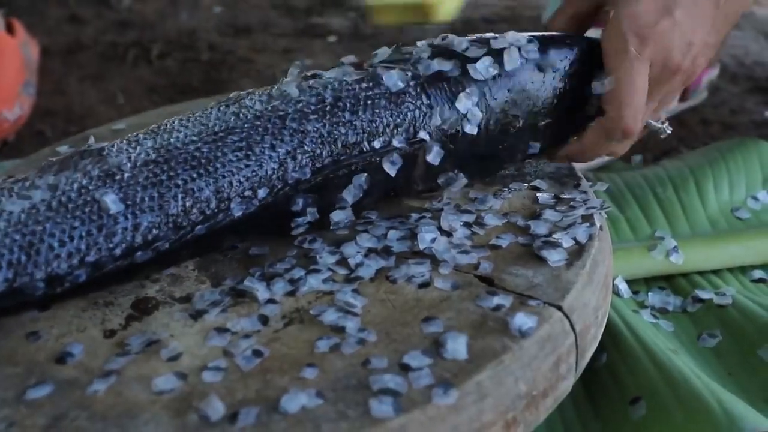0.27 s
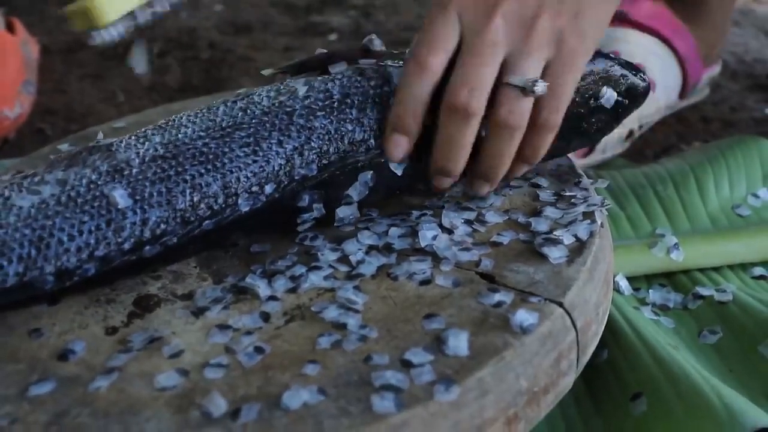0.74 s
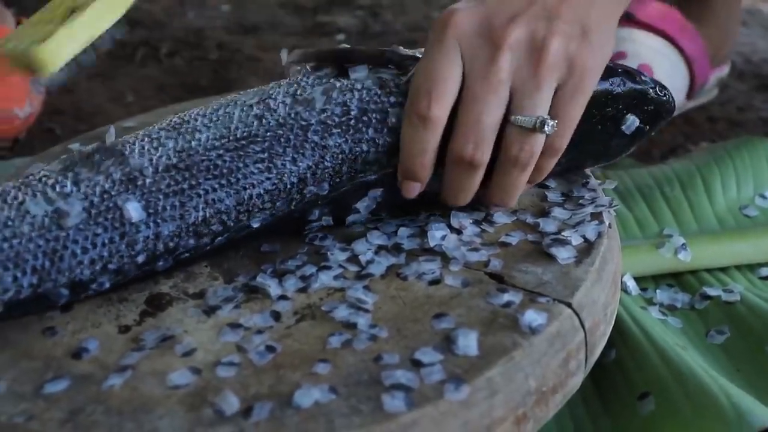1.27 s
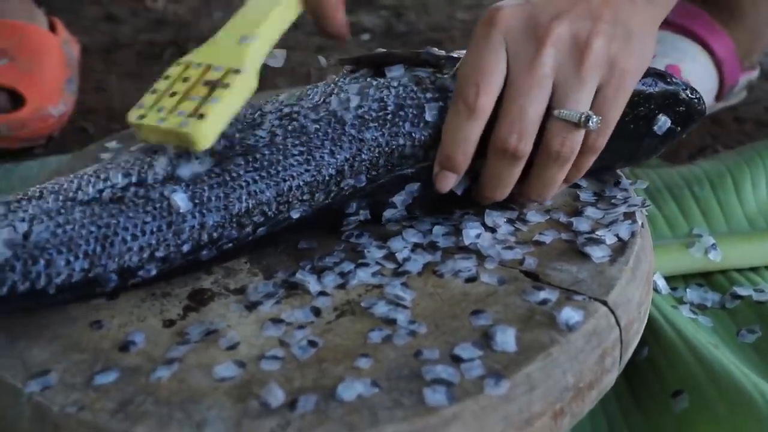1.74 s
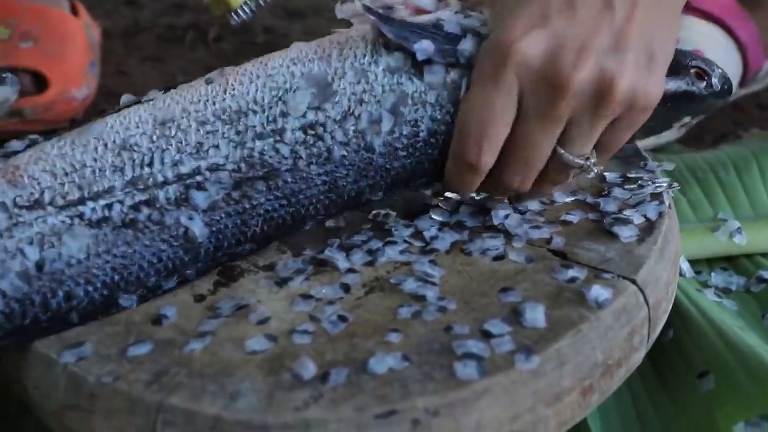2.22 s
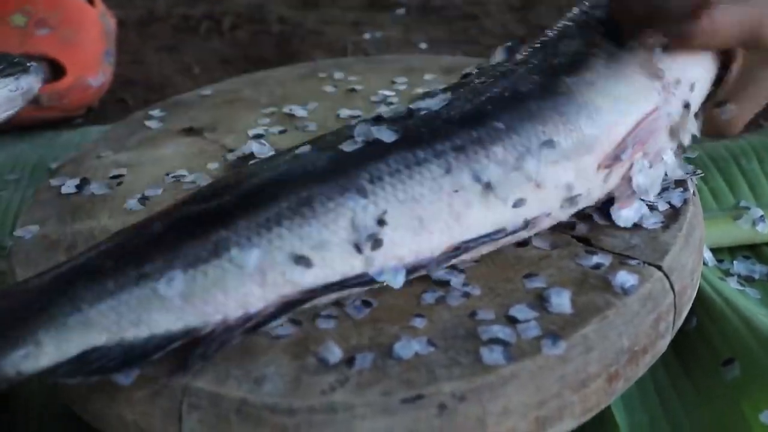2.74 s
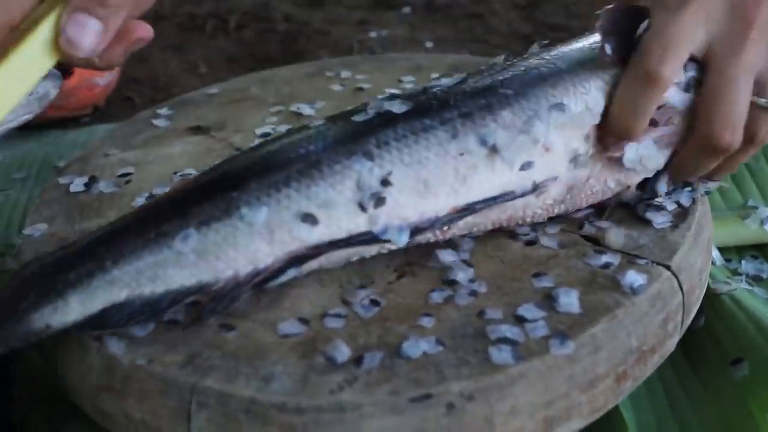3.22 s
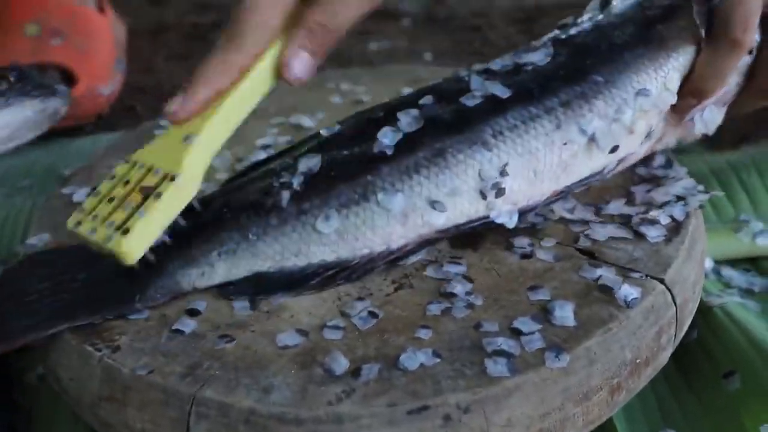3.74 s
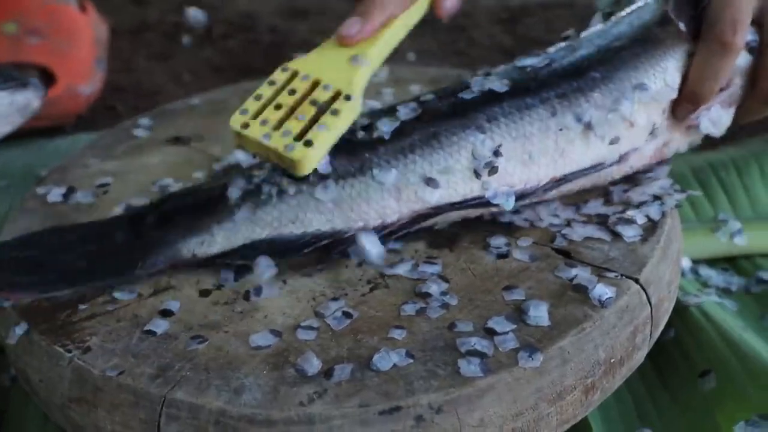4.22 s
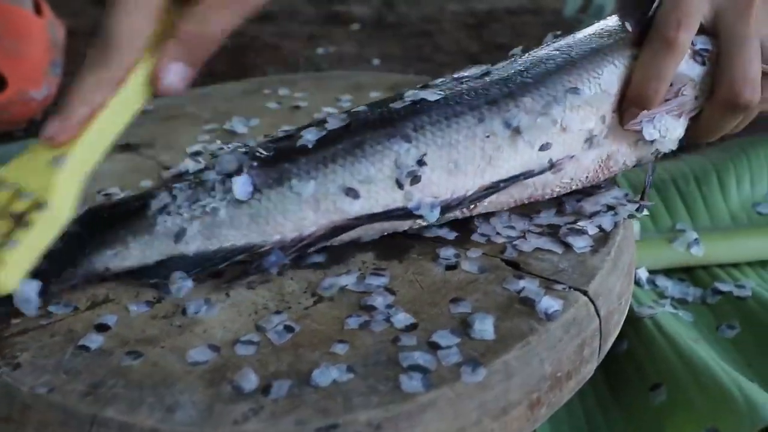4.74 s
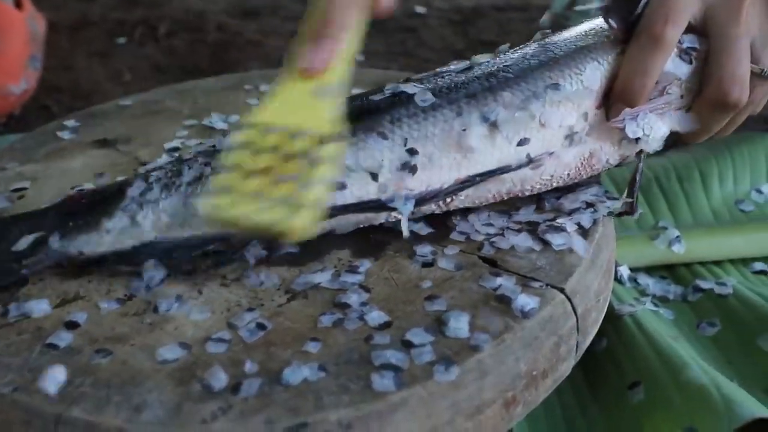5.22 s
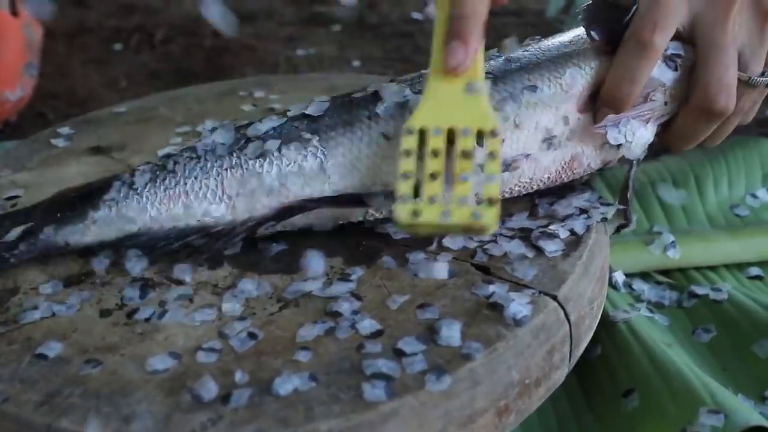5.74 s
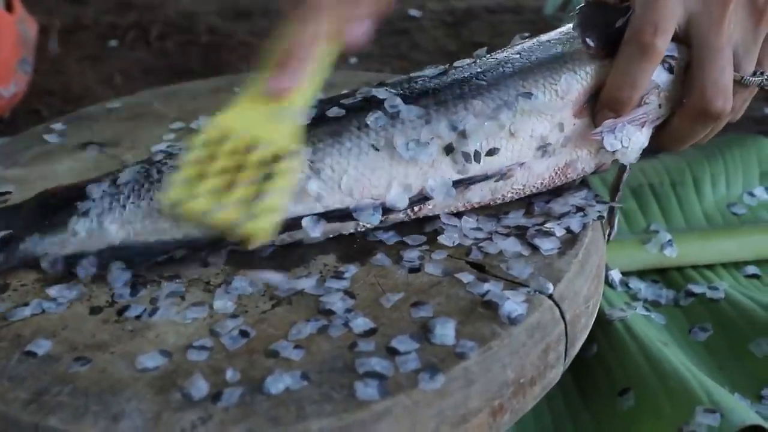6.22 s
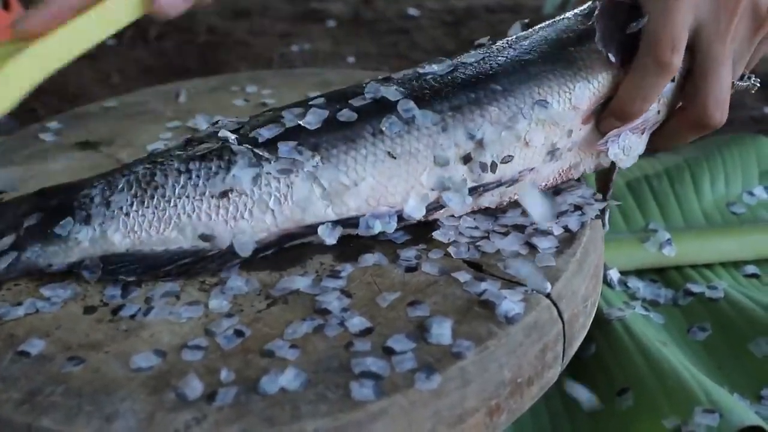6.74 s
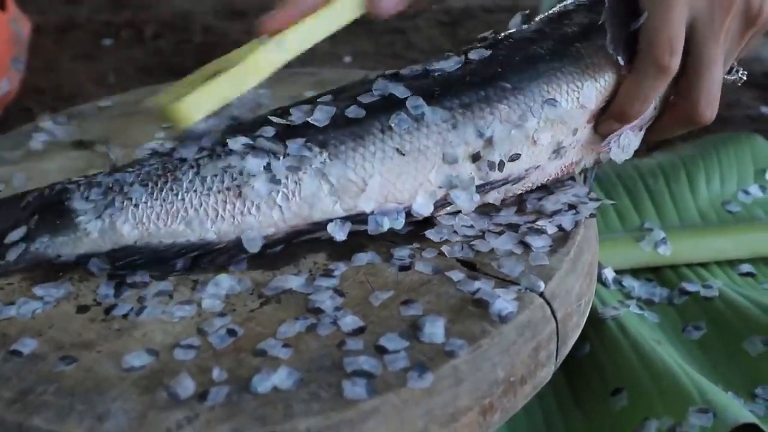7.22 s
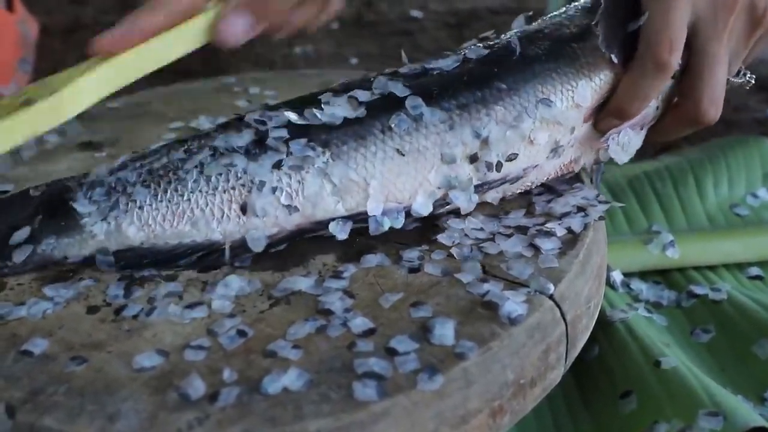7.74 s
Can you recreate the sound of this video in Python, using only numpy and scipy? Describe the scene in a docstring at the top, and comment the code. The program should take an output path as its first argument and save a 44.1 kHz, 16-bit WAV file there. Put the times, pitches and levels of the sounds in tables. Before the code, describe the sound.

Very close, a plastic scaler with nail teeth scrapes a whole fish on a thick wooden board. A few uneven strokes come first, then a quieter moment of handling and sliding as the fish is turned, then steady strokes about three a second. Each is a short gritty rasp with rattling scales and sharp snaps; dull thuds come from the board. Quiet open air behind, dry mono, loudest snaps clipped.

```python
"""Outdoors, a thick wooden board: a plastic scaler with nail teeth strokes a whole fish, close to the
microphone. Teeth rasp (filtered grains), rows of scales rattle (near-even flicks), single scales snap (noisy
impulses). Fish and board thud (damped resonances); nails ring (decaying sines); something metal is rubbed and
squeaks (narrow-band noise). Quiet open air (banded noise) lies behind; the loudest snaps clip."""
import sys
import numpy as np
from scipy import signal
from scipy.io import wavfile
from scipy.ndimage import uniform_filter1d

SR = 44100
rng = np.random.default_rng(int(sys.argv[2]) if len(sys.argv) > 2 else 0)


def wav_record(signal):
    """Record a signal, one row per channel, as 16-bit PCM in the file named by sys.argv[1]."""
    frames = np.transpose(np.atleast_2d(signal))
    bounded = np.clip(frames, -1, 1)
    # unit amplitude maps onto the largest positive 16-bit level
    quanta = np.round(bounded * 32767).astype(np.int16)
    wavfile.write(sys.argv[1], SR, quanta)


N = 351918

# Firm strokes: (start [s], rise [s], pull [s], top force [dB], sag over the pull [dB],
# treble re force [dB], board load re force [dB])
FIRM_STROKES = [(0.0, 0.013, 0.011, -14.5, 11, 0.5, -16), (0.215, 0.083, 0.063, -27.5, 7, -2, -8),
                (0.574, 0.1, 0.032, -26, 9.5, -5, -6.5), (1.109, 0.014, 0.15, -22.5, 8, -10.5, -7),
                (1.53, 0.013, 0.086, -17, 7.5, -12, -6.5), (1.782, 0.013, 0.081, -19, -3.5, -9, -6.5),
                (2.05, 0.025, 0.084, -14.5, 11.5, -10, -9), (2.597, 0.14, 0.063, -34, 29, 5, -5),
                (2.979, 0.1, 0.067, -37.5, 12, -3, -7.5), (3.55, 0.0052, 0.16, -19.5, 11, -1.5, -9),
                (3.905, 0.031, 0.12, -18, 7.5, -2.5, -13), (4.265, 0.048, 0.065, -18.5, 10.5, -3.5, -8.5),
                (4.6, 0.038, 0.064, -19.5, 8.5, -5, -8.5), (4.9, 0.065, 0.079, -18, 14, -1, -3),
                (5.197, 0.047, 0.083, -17, -1.5, -3, -7.5), (5.485, 0.038, 0.088, -16.5, 6.5, -7.5, -7.5),
                (5.772, 0.018, 0.08, -14.5, 9.5, -4.5, -2.5), (6.05, 0.033, 0.053, -16.5, 3, -2.5, -2.5),
                (6.338, 0.025, 0.07, -15.5, 5, -3.5, -1.5), (6.64, 0.056, 0.082, -20, 1.5, -3.5, -9),
                (6.995, 0.0039, 0.078, -21.5, -3.5, -3.5, -6), (7.307, 0.011, 0.12, -23, -4, -2.5, -12),
                (7.629, 0.055, 0.065, -13.5, 6, -10, -15), (7.932, 0.027, .03, -24, -2, -8.5, -16.5)]
# Light drags and handling between strokes: (start [s], length [s], mid-way force [dB],
# change start to end [dB], load re force [dB])
LIGHT_DRAGS = [(0.012, 0.066, -44.5, 3, -3), (0.826, 0.082, -46.5, 19.5, 9.5),
               (1.612, 0.14, -33.5, 5.5, -7.5), (1.914, .145, -43.5, 11, -2),
               (2.156, 0.15, -34.5, -20.5, -7.5), (3.327, 0.23, -38.5, 8.5, -3.5),
               (3.717, 0.19, -41, -6, -3), (4.043, 0.21, -39.5, 0, -8), (4.43, 0.16, -42.5, 8, -5.5),
               (4.769, 0.19, -42.5, -8, -8), (5.066, 0.048, -31, 0.5, -6.5), (5.351, 0.036, -38, 31, -7.5),
               (5.627, 0.056, -37, -11, -13), (5.872, 0.15, -42.5, -1, -2), (6.174, 0.047, -45, 18, -4),
               (6.249, 0.083, -44.5, 16, -1), (6.432, 0.06, -47, -5, 5), (6.58, 0.1, -43.5, 16, -7),
               (6.779, 0.087, -53.5, -3, -7), (7.084, 0.02, -35, -20, -5), (7.197, 0.037, -35, 12, -24),
               (7.445, 0.16, -47, -26, -11), (7.753, 0.089, -32, -14, -11.5)]
# Colour along the fish: (time [s], deep thud re load [dB], topmost treble gain [dB],
# tooth chatter re board [dB], rattle re force [dB])
FISH_COLOUR = [(0, -2, -9, -1.5, -10), (1.1, -12, -1, -16.5, -3.5), (2.2, -17.5, -13, -8, -3.5),
               (3, -7, -4, -6.5, -8), (4.6, -5.5, -2, -1.5, -3.5), (5.6, -5, 0, -1, -5),
               (6.6, -12.5, -5.5, -3, -1.5), (7.98, -4.5, -2.5, 3.5, -3)]
# Loud single scales snapping off: (time [s], peak of the scale ring [dB])
SCALE_SNAPS = [(.019, -4.5), (0.0708, -14.5), (.307, -17), (0.3317, -13), (0.3397, -13.5), (1.114, -8.5),
               (1.118, -11), (1.125, -8), (1.1357, -6.5), (1.5375, -7.5), (1.5445, -1), (1.5507, -10),
               (1.5704, -6), (1.789, -8), (1.818, -3), (2.066, -13), (2.0733, -1), (2.0793, -2),
               (2.0835, -2), (2.485, -28.5), (2.6945, -26), (3.063, -18.5), (3.5556, -4), (3.5854, -2.5),
               (3.6166, -6), (3.6487, -6.5), (3.683, -14.5), (3.713, -11), (3.944, -1.5), (4.0238, 1),
               (4.041, -3), (4.295, -7), (4.328, -4), (4.6335, -5.5), (4.9736, -4), (5.0264, -14),
               (5.2368, -2), (5.246, -4), (5.3088, -1.5), (5.593, -5.5), (5.782, -4), (5.8603, -7),
               (6.156, -20.5), (6.3156, -14.5), (6.428, -18), (6.692, -2.5), (6.771, -10), (7.311, -10.5),
               (7.333, -3), (7.4189, -4), (7.6752, -2.5), (7.694, 0)]
# Scaler or fish lands: (time [s], peak [dB], pitch [Hz])
LANDINGS = [(1.928, -29.5, 1020), (2.67, -25, 1440), (3.104, -28.5, 394), (3.151, -27.5, 553),
            (3.445, -30, 905), (5.135, -27, 930), (5.203, -11, 625), (5.483, -12, 620), (5.772, -9, 770),
            (6.002, -28, 668), (6.046, -7.5, 626), (6.594, -29, 940), (6.923, -26.5, 910),
            (7.552, -24.5, 900), (7.594, -23, 645), (7.809, -25, 676)]
# Fish slides on the wood: (start [s], length [s], level [dB])
FISH_SLIDES = [(1.571, 0.077, -32.5), (2.121, 0.15, -41), (2.548, 0.21, -49.5), (3.339, 0.1, -41.5),
               (3.486, 0.086, -34)]
# Something metal is rubbed: (start [s], length [s], level [dB])
METAL_RUBS = [(2.689, 0.046, -32), (3.47, 0.07, -37), (4.063, 0.036, -34.5)]
# Nail left ringing: (time [s], level [dB], pitch re the nail modes [ratio])
NAIL_RINGS = [(1.234, -30, .95), (7.51, -26, 1), (7.805, -24, 1)]
# Scale resonances: (centre [Hz], width [Hz], gain [dB])
SCALE_MODES = [(2730, 1040, -4.5), (4173, 560, 3.5), (5095, 1040, -1)]
# Treble resonances of the scales: (centre [Hz], width [Hz], gain [dB])
TREBLE_MODES = [(6160, 4500, -5), (9830, 3300, -7), (12800, 7100, -8)]
# Board resonances: (centre [Hz], width [Hz], gain [dB])
BOARD_MODES = [(334, 144, -0.5), (622, 213, -2.45), (1036, 257, -2.1)]
# Nail modes: (pitch [Hz], level [dB], 60 dB decay [s], onset delay [s])
NAIL_MODES = [(4000, 2.5, 0.069, 0.02), (6490, 4, 0.066, 0.0007)]
# Metallic sheen modes: (centre [Hz], level [dB])
SHEEN_MODES = [(1800, -1.5), (4580, -11.5), (5850, 4), (7260, 3), (8850, -6)]
# Open-air spectrum: (frequency [Hz], relative density [dB per Hz])
AIR_SPECTRUM = [(30, 1), (350, -3), (1000, -11), (2500, -20), (4500, -12), (16000, -32.5)]

BITE_DB = 20.5  # a stroke touches down this far below its top
TRAIL_S, TRAIL_DB, TRAIL_DB_PER_S = 0.0078, -20.5, 397  # teeth leave the skin: quick drop plus fade
DRAG_ARCH_DB, DRAG_TREBLE_DB = 6, -3  # mid-way swell; treble re force
REST_DB, REST_LOAD_DB = -58.5, -5.5  # fish shifting under the resting hand; load re force
RASP_YIELD = 0.6  # share of the rasp that gives way to the rattle in a firm stroke
RATTLE_PER_S, RATTLE_JITTER, RATTLE_SPREAD_DB = 270, 0.3, 4
FLICK_HZ, FLICK_WIDTH_HZ = 4290, 2030  # a scale flicked free
SNAP_TREBLE_DB = 3.5  # re the treble of the stroke
SHEEN_WIDTH_HZ, AIR_DB, TOP_HZ = 53, -52.5, 16000


def undb(db):
    """Decibels to gain."""
    return 10 ** (np.asarray(db) / 20)


def unit(x):
    """Scale to rms 1."""
    return x / np.sqrt(np.mean(x ** 2))


def curve(rows, column):
    """Table column joined by straight lines in time."""
    rows = np.array(rows)
    return np.interp(np.arange(N) / SR, rows[:, 0], rows[:, column])


def band(x, hz, width_hz):
    """Two-pole resonance, gain 1 at the centre."""
    b, a = signal.iirpeak(hz, hz / width_hz, fs=SR)
    return signal.lfilter(b, a, x)


def body(x, modes):
    """Resonances summed, neighbours in opposite phase."""
    return sum((-1) ** k * undb(db) * band(x, hz, width_hz)
               for k, (hz, width_hz, db) in enumerate(modes))


def walk(rate_hz):
    """Random levels held 1 / rate, slewed over one hold; spread just under 1."""
    hold = int(SR / rate_hz)
    levels = np.repeat(rng.standard_normal(N // hold + 1), hold)
    return uniform_filter1d(levels, hold)[:N]


def grains(per_s, spread_db, smear_s):
    """Random rounded noise bursts, rms 1; sizes exponential in dB, capped so that no single click stands out."""
    hit, size = rng.random((N, 2)).T
    size_db = spread_db * np.minimum(-np.log(1 - size), 3.5)
    clicks = (hit < per_s / SR) * undb(size_db)
    envelope = np.convolve(clicks, np.hanning(int(smear_s * SR)))[:N]
    return unit(envelope * rng.standard_normal(N))


def add(out, start_s, sound):
    """Mix a short sound in at a time."""
    i = int(start_s * SR)
    out[i:i + len(sound)] += sound[:N - i]


def scrape():
    """Teeth catch scale after scale; the same catches shake fish and board."""
    force, treble_force, load_force = contact_force()
    treble_gain, load_gain = treble_force / force, load_force / force
    # only a firm stroke lifts scales in rows
    firm = np.interp(20 * np.log10(force), [-40, -22], [0, 1])
    uneven_db = 4.0 - 1.7 * firm  # a light drag skips, a firm stroke holds
    pressure = force * undb(uneven_db * walk(45) + 2.2 * walk(90))
    catches = grains(700, 3.9, 0.001) + 0.41 * rng.standard_normal(N)

    contact = (1 - RASP_YIELD * firm) * rasp(catches)
    contact = contact + treble_gain * treble(catches) + load_gain * board_load(catches)
    contact = unit(patchy(contact, patchy_db=3.0, rate_hz=30, count=36)) * np.std(contact)
    # scale edges tick across the teeth
    edge_ticks = unit(band(grains(160, 3.6, 0.00028), 7200, 6300))
    contact = contact + treble_gain * undb(-8) * edge_ticks
    contact = contact + firm * undb(curve(FISH_COLOUR, 4)) * rattle()
    contact = contact + load_gain * undb(curve(FISH_COLOUR, 1)) * thud()
    # freed scales drop on the wood
    loose = unit(band(grains(25, 4.5, 0.0046), 1200, 1600)) * pressure ** 0.38
    return pressure * contact + undb(-37) * loose


def contact_force():
    """Tooth force as gains for rasp, treble and board load: rest plus strokes and drags."""
    t = np.arange(int(0.4 * SR)) / SR
    rest_db = REST_DB + np.array([[0], [DRAG_TREBLE_DB], [REST_LOAD_DB]])
    force = np.ones((3, N)) * undb(rest_db)
    touches = []
    for start_s, rise_s, pull_s, db, sag_db, treble_db, load_db in FIRM_STROKES:
        corners_s = np.cumsum([0, rise_s, pull_s, TRAIL_S])
        shape_db = np.interp(t, corners_s, [-BITE_DB, 0, 0, TRAIL_DB])
        shape_db -= sag_db * np.clip((t - rise_s) / pull_s, 0, 1)
        shape_db -= TRAIL_DB_PER_S * np.maximum(t - rise_s - pull_s, 0)
        touches.append((start_s, db + shape_db, treble_db, load_db))
    for start_s, length_s, db, change_db, load_db in LIGHT_DRAGS:
        done = t[t < length_s] / length_s
        shape_db = change_db * (done - 0.5) - DRAG_ARCH_DB * (1 - np.sin(np.pi * done))
        touches.append((start_s, db + shape_db, DRAG_TREBLE_DB, load_db))
    for start_s, db, treble_db, load_db in touches:
        for row, re_db in zip(force, (0, treble_db, load_db)):
            add(row, start_s, undb(db + re_db))
    return force


def rasp(catches):
    """Catches ring the scale modes; rms 1."""
    return unit(band(body(catches, SCALE_MODES), 4220, 2430))


def treble(catches):
    """Catches plus finer grains ring the treble modes; the top mode varies along the fish."""
    fine = 0.46 * catches + grains(1500, 4.5, 0.0007)
    lower = band(body(fine, TREBLE_MODES[:-1]), 10000, 9800) * undb(4.7 * walk(31))
    finest = 0.41 * catches + 1.17 * grains(1200, 6.4, 0.00046)
    top = band(body(finest, TREBLE_MODES[-1:]), 11000, 5600)
    return (lower + undb(curve(FISH_COLOUR, 2)) * top) / np.std(lower)


def board_load(catches):
    """Flesh averages the catches into a push on the board modes; teeth chatter above."""
    grip = uniform_filter1d(np.abs(catches), int(0.0049 * SR))
    push = (grip + 0.024) * rng.standard_normal(N)
    board = band(body(push, BOARD_MODES), 440, 1400) * undb(4.3 * walk(29))
    chatter = band(0.52 * catches + grains(700, 2.4, 0.0018), 1990, 2340)
    return unit(board) + undb(curve(FISH_COLOUR, 3)) * unit(chatter)


def thud():
    """Deep thud: uneven noise through two low resonances; rms 1."""
    push = rng.standard_normal(N) * undb(3.2 * walk(25))
    return unit(band(band(push, 184.4, 126), 52, 220))


def patchy(x, patchy_db, rate_hz, count):
    """Scales differ in size: narrow bands come and go as the contact shifts."""
    centres_hz = np.geomspace(250, 17000, count)
    return sum((-1) ** k * undb(patchy_db * walk(rate_hz)) * band(x, hz, 0.11 * hz)
               for k, hz in enumerate(centres_hz))


def rattle():
    """Rows of scales let go one after another: near-even flicks, each a short ring; rms 1."""
    gap, size = rng.standard_normal((N // 40, 2)).T
    at = (np.cumsum(np.exp(RATTLE_JITTER * gap)) * SR / RATTLE_PER_S).astype(int)
    inside = at < N
    flicks = np.zeros(N)
    flicks[at[inside]] = undb(RATTLE_SPREAD_DB * size)[inside]
    ring = band(body(flicks, SCALE_MODES), FLICK_HZ, FLICK_WIDTH_HZ)
    return unit(ring + undb(-13) * body(flicks, TREBLE_MODES))


def snaps():
    """Sharp flick with a little grit rings the scale; treble follows the stroke it falls in."""
    out, t = np.zeros(N), np.arange(400) / SR
    force, treble_force, _ = contact_force()
    treble_gain = undb(SNAP_TREBLE_DB) * treble_force / force
    grit = rng.standard_normal((len(SCALE_SNAPS), len(t)))
    for (time_s, db), noise in zip(SCALE_SNAPS, grit):
        burst = (t == 0) + 0.46 * noise * np.exp(-t / 0.00036)
        ring = band(body(burst, SCALE_MODES), FLICK_HZ, FLICK_WIDTH_HZ)
        tick = body(burst, TREBLE_MODES)
        bright = treble_gain[int(time_s * SR)]
        snap = ring / np.abs(ring).max() + bright * tick / np.abs(tick).max()
        add(out, time_s, undb(db) * snap)
    return out


def knocks():
    """Dull, quickly damped blow: one pitch plus the board modes."""
    out, t = np.zeros(N), np.arange(2000) / SR
    push = np.exp(-t / 0.000096) * t * SR
    squash = rng.standard_normal((len(LANDINGS), len(t)))
    for (time_s, db, hz), noise in zip(LANDINGS, squash):
        shove = push + 1.3 * noise * np.exp(-t / 0.005)  # wet scales squash under the blow
        pitched = band(band(shove, hz, 0.34 * hz), hz, 2 * hz)
        blow = pitched + undb(-17.5) * body(shove, BOARD_MODES)
        add(out, time_s, undb(db) * blow / np.abs(blow).max())
    return out


def rubs():
    """Wet fish sliding on the wood hums in the board's lowest mode."""
    hum = unit(band(band(rng.standard_normal(N), 363, 69), 338, 150))
    gain = np.zeros(N)
    for start_s, length_s, db in FISH_SLIDES:
        add(gain, start_s, undb(db) * np.hanning(int(length_s * SR)) ** 0.14)
    return gain * hum * undb(3 * walk(30))


def rings():
    """Nail modes, rubbed up over a few milliseconds and dying away."""
    out, t = np.zeros(N), np.arange(5000) / SR
    rise = (1 - np.exp(-t / 0.0034)) ** 2
    for time_s, db, pitch in NAIL_RINGS:
        for hz, mode_db, t60_s, late_s in NAIL_MODES:
            decay = undb(db + mode_db - 60 * t / t60_s)
            add(out, time_s + late_s, decay * rise * np.sin(2 * np.pi * pitch * hz * t))
    return out


def squeaks():
    """Thin metallic sheen: rubbing noise in a set of narrow modes."""
    sheen = sum(undb(db) * unit(band(rng.standard_normal(N), hz, SHEEN_WIDTH_HZ))
                for hz, db in SHEEN_MODES)
    gain = np.zeros(N)
    for start_s, length_s, db in METAL_RUBS:
        add(gain, start_s, undb(db) * np.sqrt(np.hanning(int(length_s * SR))))
    return gain * unit(sheen)


def air():
    """Open-air hush in half-octave bands that swell together and flicker alone."""
    out, swell = 0, walk(6.6)
    spectrum = np.array(AIR_SPECTRUM)
    for hz in 40 * 2 ** np.arange(0, 8.8, 0.5):
        db = np.interp(np.log(hz), np.log(spectrum[:, 0]), spectrum[:, 1])
        db = db + 2.2 * swell + 2.0 * walk(6.4)
        hush = band(band(rng.standard_normal(N), hz, hz / 2), hz, hz / 2)
        out = out + undb(db) * hush
    return undb(AIR_DB) * unit(out)


def scene():
    """All layers summed to one channel."""
    return (scrape() + snaps() + knocks() + rubs() + rings() + squeaks() + air())[None]


def record(dry):
    """Peaks clip at 0.8, then a steep low-pass cuts the top."""
    cut = signal.ellip(10, 0.2, 75, TOP_HZ, fs=SR, output="sos")
    return signal.sosfilt(cut, np.clip(dry, -0.8, 0.8))


dry = scene()
out = record(dry)
wav_record(out)
```